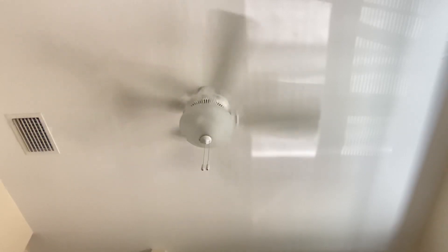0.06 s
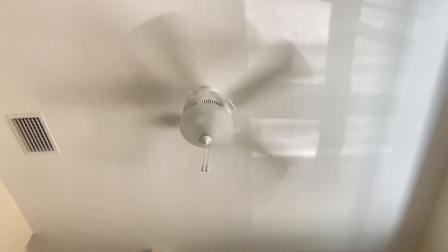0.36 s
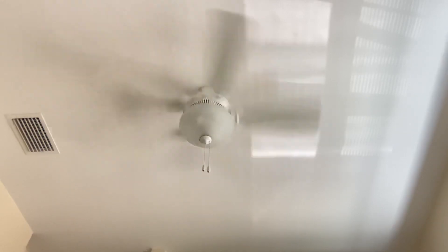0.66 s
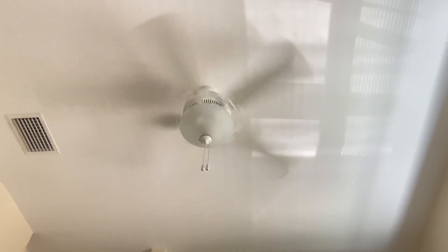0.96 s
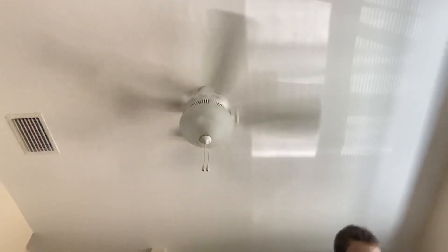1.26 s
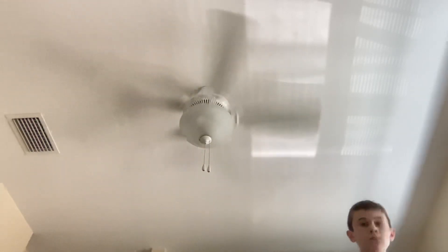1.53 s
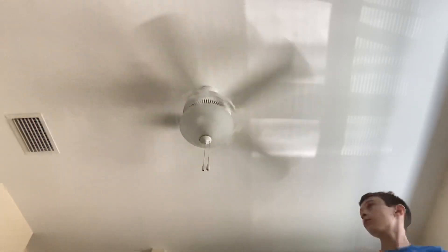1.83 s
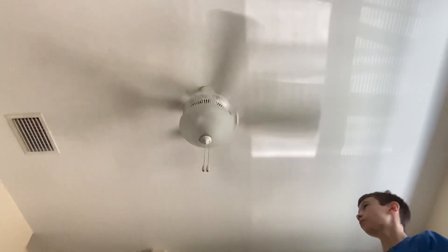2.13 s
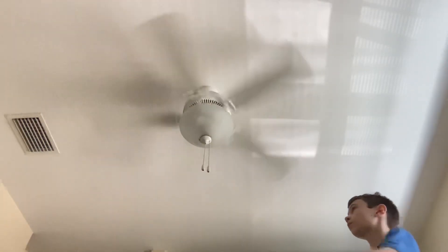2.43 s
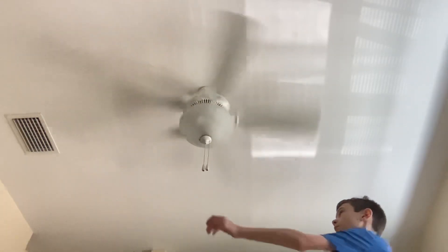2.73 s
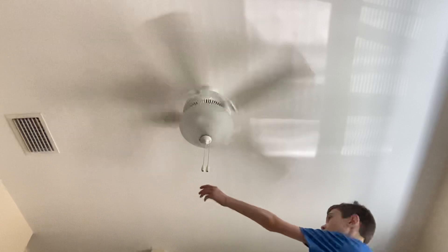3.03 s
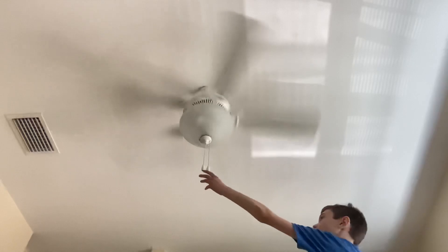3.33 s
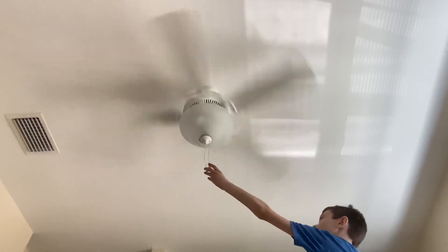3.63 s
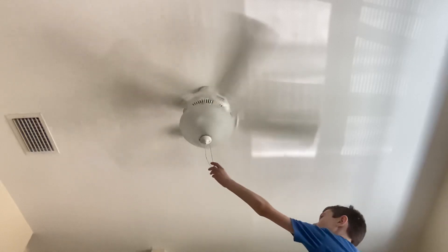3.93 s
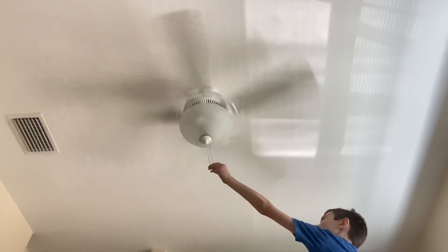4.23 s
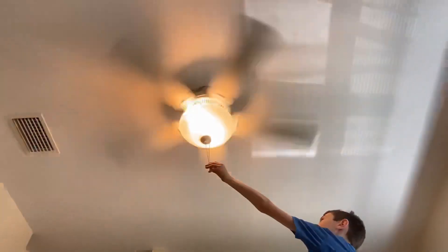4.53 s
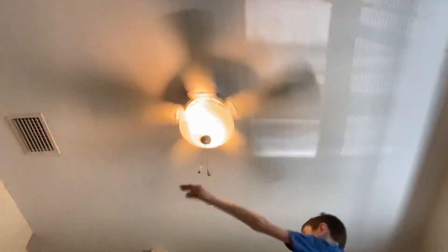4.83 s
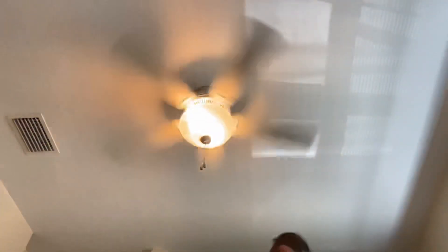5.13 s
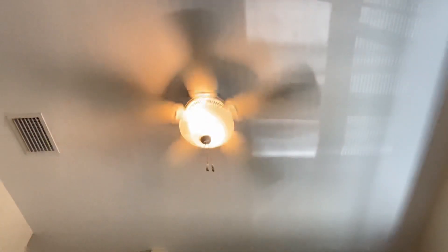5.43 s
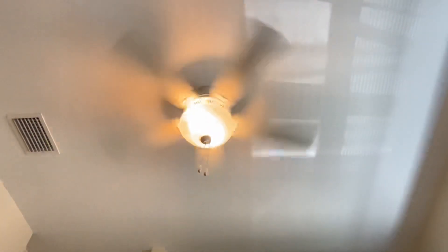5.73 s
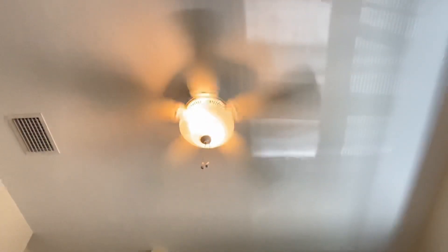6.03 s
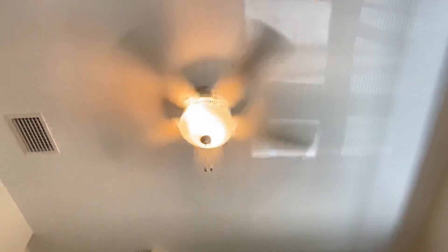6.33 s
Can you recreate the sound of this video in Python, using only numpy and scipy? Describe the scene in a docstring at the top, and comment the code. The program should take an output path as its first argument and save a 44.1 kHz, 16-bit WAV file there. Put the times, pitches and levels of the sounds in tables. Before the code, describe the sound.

Under a ceiling fan's low hum, someone climbs creaking furniture, pulls a ticking metal chain until the switch snaps, then steps down.

```python
"""A ceiling fan hums and stirs the air in a small bedroom, heard in mono on a faintly hissing microphone.
Clothes rustle as someone climbs onto furniture, its joints slipping and creaking under the load.
They catch the fan's bead chain and pull: the beads tick, the light switch snaps in and springs back.
They step down again and the floor gives a dull thud. Walls and ceiling are near, so echoes come fast."""
import sys
import numpy as np
from scipy import signal
from scipy.fft import rfft, irfft
from scipy.io import wavfile
from scipy.ndimage import uniform_filter1d

SR = 44100
rng = np.random.default_rng(int(sys.argv[2]) if len(sys.argv) > 2 else 0)


def wav_record(signal):
    """Record a signal, one row per channel, as 16-bit PCM in the file named by sys.argv[1]."""
    frames = np.transpose(np.atleast_2d(signal))
    bounded = np.clip(frames, -1, 1)
    # unit amplitude maps onto the largest positive 16-bit level
    quanta = np.round(bounded * 32767).astype(np.int16)
    wavfile.write(sys.argv[1], SR, quanta)


N = 289296
T = np.arange(N) / SR
RING_T = T[:SR * 3 // 4]  # time axis of one ring or echo tail


# The motor overhead. Each row: multiple of the hum's pitch, rms level in dB.
HUM_HARMONICS = [(1, -44.5), (2, -61.5), (3, -64.5)]
# Air stirred by the blades, with faint steady microphone hiss on top.
# Each row: frequency in Hz, relative density in dB.
AIR_AND_HISS_SPECTRUM = [(25, -34), (42, -16.5), (60, 1), (150, 1.5), (340, 2), (520, -3), (680, -10.5),
                         (950, -11.5), (1300, -22), (2000, -27), (2800, -26.5), (4000, -39.5),
                         (7500, -36.5), (10000, -46), (15500, -55)]

def fan():
    """The motor hums at twice the mains frequency; air swells with each blade, under faint mic hiss."""
    hum_hz, blade_hz, noise_db = 119.99, 14, -51
    hum = np.zeros(N)
    for multiple, db in HUM_HARMONICS:
        waver_db = 0.5 * wander(rate=6)
        tone = np.sqrt(2) * np.sin(2 * np.pi * (multiple * hum_hz * T + rng.random()))
        hum += undb(db + waver_db) * tone
    swell_db = 0.5 * np.sin(2 * np.pi * blade_hz * T) + 1.1 * wander(rate=5)
    air_and_hiss = unit_rms(through(rng.standard_normal(N), colour(AIR_AND_HISS_SPECTRUM)))
    return hum + air_and_hiss * undb(noise_db + swell_db)


# Clothes, one swish a movement. Each row: fastest moment in seconds, rise in seconds, level in dB.
SWISHES = [(0.08, 0.049, -61), (0.42, .05, -50), (0.72, 0.24, -63), (1.04, 0.072, -56),
           (1.27, 0.042, -59.5), (1.51, 0.038, -59), (1.71, 0.07, -56), (2.65, 0.11, -65.5),
           (2.92, .11, -62.5), (3.32, 0.12, -68), (3.83, .04, -66.5), (4.86, 0.075, -60.5),
           (5.17, 0.093, -57), (5.41, 0.016, -52), (5.56, 0.052, -49), (5.82, 0.083, -53.5),
           (6.18, 0.047, -52.5), (6.42, 0.09, -65.5)]
# Weight shifting on the bedding. Each row: centre in seconds, half-width in seconds, level in dB.
BEDDING_SCUFFS = [(0.46, 0.062, -45.5), (1.034, 0.035, -57), (1.267, 0.02, -58), (1.526, 0.029, -58),
                  (5.465, 0.038, -50.5), (5.576, 0.43, -54.5), (6.103, 0.08, -52), (6.35, 0.051, -54.5)]
# Bright clothes, then duller bedding. Each row: frequency in Hz, relative density in dB.
CLOTHES_SPECTRUM = [(150, 6), (500, 4.5), (1200, 3), (2800, 3), (4500, 0.5), (7200, 4.5), (9000, -1.5),
                    (10200, -13.5), (11600, 1), (13500, -11), (15500, -11.5)]
BEDDING_SPECTRUM = [(60, -5), (200, 10), (550, 8), (1000, -2), (2500, -10), (6000, -21), (15000, -27)]

def cloth():
    """Fibres catch and slip in dense grains as the body moves; the bedding scuffs under its weight."""
    hiss_db = -83.5  # a faint steady hiss under the rustling
    moving_power = sum((undb(db) * swish(peak, rise)) ** 2 for peak, rise, db in SWISHES)
    level = np.sqrt(undb(hiss_db) ** 2 + moving_power)
    fibres = through(grains(rate=4000, scatter_db=1), colour(CLOTHES_SPECTRUM))
    flutter_db = 0.9 * wander(rate=30)
    weight = sum(undb(db) * np.exp(-((T - centre) / width) ** 2) for centre, width, db in BEDDING_SCUFFS)
    bedding = through(grains(rate=3000, scatter_db=2), colour(BEDDING_SPECTRUM))
    return fibres * level * undb(flutter_db) + bedding * weight


def swish(peak, rise):
    """Speed of one movement: it swells to 1 at the peak time and dies away more slowly."""
    fall = 1.69 * rise
    away = np.where(T < peak, (peak - T) / rise, (T - peak) / fall)
    return 1 / np.cosh(away)


# Creaks of the furniture's joints, two followed by a quick ceiling echo (at 1.601 and 1.691 seconds).
# Each row: start in seconds, strength in dB.
CREAKS_AND_ECHOES = [(1.498, -18.5), (1.586, -9.5), (1.601, -11), (1.612, -10), (1.634, -8), (1.677, -8),
                     (1.691, -7.5), (1.766, -7.5), (1.804, -9.5), (1.917, -6.5), (2.474, -14.5),
                     (2.512, -13), (2.857, -8), (3.038, -17), (3.438, -10.5), (5.408, -5.5)]
# The furniture's frame. Each row: mode in Hz, relative level in dB, t60 in seconds.
FRAME_MODES = [(863, -7, 0.039), (1016, -7, 0.045), (1660, -2, 0.016), (1765, -6, 0.039),
               (2810, 6.5, 0.0066), (2837, -1, 0.025), (3550, -15, 0.018), (3820, -5.5, 0.02),
               (4670, -16, 0.0088)]
# The crack of one slip. Each row: frequency in Hz, relative density in dB.
SLIP_SPECTRUM = [(300, -30), (900, 3.5), (1350, -2), (3000, 3), (5500, 6), (9000, 1), (10200, -16.5),
                 (11500, -2), (15500, -18)]

def creaks():
    """A slipping joint cracks and rings the frame; each creak or echo takes its own paths to the mic."""
    out = np.zeros(N)
    for start, db in CREAKS_AND_ECHOES:
        frame = undb(-10) * ring(FRAME_MODES, detune=0.014)
        crack = undb(-14) * through(chatter(t60=0.026), colour(SLIP_SPECTRUM))
        walls = bedroom(t60_mid=0.42, t60_high=0.32, tail_db=-0.5)
        add(out, start, undb(db) * through(frame + crack, walls))
    return out


# Beads running over each other and the outlet's rim, up at the fan. Each row: start, rise and fall
# in seconds, level in dB, the outlet's ring in dB relative to that level.
BEAD_RUNS = [(3.525, 0.0083, 0.014, -59.5, 1), (3.817, 0.0072, 0.018, -42.5, -32),
             (3.832, 0.0079, 0.024, -49, -24), (3.9, 0.011, 0.043, -53.5, -25),
             (4.145, 0.0079, 0.032, -60, 0), (4.237, 0.0053, 0.19, -62, 1.5), (4.46, 0.021, 0.061, -53, -6)]
# The beads' ticking. Each row: frequency in Hz, relative density in dB.
BEAD_SPECTRUM = [(800, -51), (2400, -6), (4500, -0.5), (6000, 5), (7200, 6), (7900, 2), (8900, -3),
                 (10000, -38), (12000, -43), (15500, -28)]
# The metal outlet. Each row: mode in Hz, relative level in dB, t60 in seconds.
OUTLET_MODES = [(2140, -7, 0.035), (4170, -1, 0.019), (5300, 0, 0.013), (5800, 2, 0.018),
                (8550, -5, 0.0065), (12000, -2, .004)]

def chain():
    """Beads tick past in quick runs; once taut, the chain also rings its metal outlet."""
    ticks = grains(rate=2200, scatter_db=2)
    loose, taut = np.zeros(N), np.zeros(N)
    for start, rise, fall, db, ring_db in BEAD_RUNS:
        attack = np.clip((T - start) / rise, 0, 1)
        decay = np.exp(-np.maximum(T - start - rise, 0) / fall)
        run = undb(db) * attack * decay
        loose += run
        taut += run * undb(ring_db)
    return through(ticks * loose, colour(BEAD_SPECTRUM)) + through(ticks * taut, ring(OUTLET_MODES))


# The switch overhead catches and springs back.
# Each row: start in seconds, strength in dB, extra gain of the spring's ping in dB.
RATCHET_SNAPS = [(4.3263, 1, -1), (4.331, -5, 14.5), (4.337, -3.5, 10.5), (4.510, 0.5, -12),
                 (4.515, 2, -19), (4.534, -8.5, -14)]
# Its housing, then its spring. Each row: mode in Hz, relative level in dB, t60 in seconds.
HOUSING_MODES = [(674, -6, 0.018), (1074, -12, 0.046), (2105, -6.5, 0.057), (3040, -7.5, 0.027),
                 (3210, 0, 0.014), (3660, -1, 0.023), (3950, -1, .025), (4150, -9, 0.031),
                 (5360, -1, 0.021), (5540, -9, 0.016), (5850, -5, 0.037), (6970, 0, 0.023),
                 (7360, -3, 0.022), (8720, 0, 0.016), (11250, 1, .008)]
SPRING_MODES = [(4025, -10.5, 0.03), (6520, -1, 0.014), (6160, -9.5, .04), (6880, -5, 0.024),
                (6830, 1.5, 0.023), (7300, -7, 0.013), (11980, 1.5, .008)]
# The crack of one snap. Each row: frequency in Hz, relative density in dB.
SNAP_SPECTRUM = [(200, 2), (700, -1), (1100, -11), (1400, -13.5), (2000, -3.5), (3300, -1), (4700, 2.5),
                 (6500, 4.5), (9000, 2), (10100, -12), (11800, 5), (13300, -1), (15500, 1.5)]

def switch():
    """The ratchet snaps with a short chatter of beads; the housing rings and the spring pings."""
    out = np.zeros(N)
    for start, db, ping_db in RATCHET_SNAPS:
        rattle = undb(-9) * through(chatter(t60=0.022), colour(SNAP_SPECTRUM))
        housing = undb(-9) * ring(HOUSING_MODES, detune=0.0045)
        spring = undb(ping_db - 12) * ring(SPRING_MODES, detune=0.0025)
        # chain and housing radiate in different directions, so their echoes differ
        for part in (rattle, housing + spring):
            walls = bedroom(t60_mid=0.4, t60_high=0.26, tail_db=4.5)
            add(out, start, undb(db) * through(part, walls))
    return out


# Down at the floor, heel and sole land briefly, the body's weight slowly.
# Each row: start in seconds, push in dB, contact time in seconds.
FOOT_PUSHES = [(5.124, -29.5, .016), (5.992, -31, .002), (6, -31.5, .001), (6.008, -26.5, .0019),
               (6.022, -28, 0.0021), (6.029, -30.5, 0.0056), (6.045, -22.5, 0.0063), (6.379, -29, .019)]
# The bedroom floor. Each row: mode in Hz, relative level in dB, t60 in seconds.
FLOOR_MODES = [(55.7, -19, 0.36), (109, -1, .05), (144, -4, 0.061), (265, -9, 0.025), (478.5, -6.5, 0.11),
               (533, -4, 0.047), (860, -3.5, 0.031)]
# The soft slap of a sole. Each row: frequency in Hz, relative density in dB.
SOLE_SPECTRUM = [(40, -34), (120, -5), (350, 7), (600, 7.5), (800, -17), (1250, -3), (1800, -21),
                 (4000, -30)]

def footfalls():
    """Each push swings and softly slaps the damped floor; a longer contact leaves only the deep modes."""
    out = np.zeros(N)
    boards = sum(undb(db) * fade(t60) * np.sin(2 * np.pi * hz * RING_T) for hz, db, t60 in FLOOR_MODES)
    for start, db, contact in FOOT_PUSHES:
        push = np.sin(2 * np.pi * np.minimum(RING_T / contact, 1))  # press, then rebound
        push /= np.abs(push).sum()
        slap = undb(22) * through(chatter(t60=0.17), colour(SOLE_SPECTRUM))
        add(out, start, undb(db) * through(push, boards + slap))
    return out


# Ceiling and near walls, from where the microphone is.
# Each row: delay in seconds, level in dB, both relative to the direct sound.
NEAR_ECHOES = [(.0032, -7), (0.011, -5.5), (0.0144, -6), (.021, -6)]

def bedroom(t60_mid, t60_high, tail_db):
    """The microphone gets the direct sound, a few hard echoes and a tail whose treble dies first."""
    noise = rng.standard_normal(len(RING_T))
    low = signal.sosfiltfilt(signal.butter(2, 8000, fs=SR, output="sos"), noise)
    tail = low * fade(t60_mid) + (noise - low) * fade(t60_high)
    build_up = 1 - np.exp(-RING_T / 0.0051)
    response = undb(tail_db) * unit_energy(build_up * tail)
    response[0] += 1  # direct sound
    for delay, db in NEAR_ECHOES:
        response[int(delay * SR)] += undb(db)
    return unit_energy(response)


def undb(db):
    """Decibels to gain."""
    return 10 ** (np.asarray(db) / 20)


def unit_rms(x):
    """Scale to rms 1."""
    return x / np.sqrt(np.mean(x ** 2))


def unit_energy(x):
    """Scale a response to energy 1."""
    return x / np.sqrt(np.sum(x ** 2))


def add(out, start, x):
    """Mix x into out from start seconds on."""
    i = int(start * SR)
    out[i:i + len(x)] += x[:N - i]


def through(x, response):
    """Pass x through an impulse response."""
    return signal.fftconvolve(x, response)[:len(x)]


def colour(points, size=4096):
    """Causal response of energy 1 with the given (Hz, dB) spectrum."""
    hz, db = np.transpose(points)
    bin_hz = np.maximum(np.arange(size // 2 + 1) * SR / size, 1)
    gain = undb(np.interp(np.log(bin_hz), np.log(hz), db))
    cepstrum = irfft(np.log(gain))
    cepstrum[size // 2:] = 0  # minimum phase
    return unit_energy(irfft(np.exp(2 * rfft(cepstrum))))


def fade(t60):
    """Decay by 60 dB in t60 seconds."""
    return np.exp(-np.log(1000) * RING_T / t60)


def ring(modes, detune=0):
    """Struck modes, their pitches scattered by the fraction detune; energy 1."""
    out = np.zeros(len(RING_T))
    for hz, db, t60 in modes:
        polarity = rng.choice([-1, 1])
        pitch = hz * (1 + detune * rng.standard_normal())
        out += polarity * undb(db) * fade(t60) * np.sin(2 * np.pi * pitch * RING_T)
    return unit_energy(out)


def wander(rate):
    """Smooth random drift through about rate values a second; rms 1."""
    hop = 100  # samples between control points
    hold = int(SR / rate) // hop + 1
    steps = np.repeat(rng.standard_normal(N // hop), hold)[:N // hop + 1]
    smooth = uniform_filter1d(steps, hold)
    return unit_rms(np.interp(np.arange(N) / hop, np.arange(len(smooth)), smooth))


def grains(rate, scatter_db):
    """Tiny random contacts of uneven size, rate per second; rms 1."""
    sizes = undb(scatter_db * rng.standard_normal(N))
    contacts = rng.random(N) < rate / SR
    return unit_rms(contacts * rng.choice([-1, 1], N) * sizes)


def chatter(t60):
    """A brief burst of tiny rebounds; energy 1."""
    return unit_energy(rng.standard_normal(len(RING_T)) * fade(t60))


def scene():
    """From one spot in the bedroom: the steady fan under the climb, the pull and the step down."""
    beads = through(chain(), bedroom(t60_mid=0.42, t60_high=0.25, tail_db=-1))
    return (fan() + cloth() + creaks() + beads + switch() + footfalls())[None]


def record(dry):
    """The phone's microphone drops the deepest bass and cuts the top."""
    bottom_hz, top_hz = 40, 15850
    thinned = signal.sosfilt(signal.butter(4, bottom_hz, "high", fs=SR, output="sos"), dry)
    return signal.sosfilt(signal.ellip(10, 0.2, 80, top_hz, fs=SR, output="sos"), thinned)


dry = scene()
out = record(dry)
wav_record(out)
```